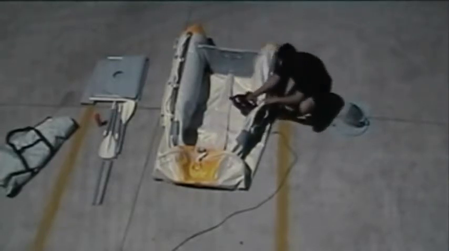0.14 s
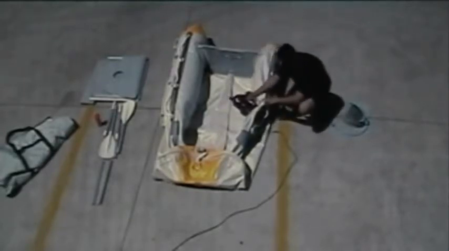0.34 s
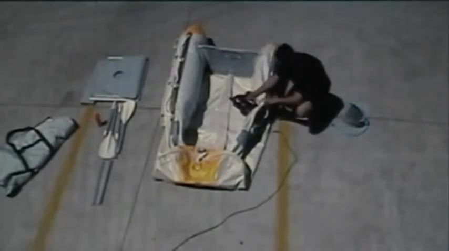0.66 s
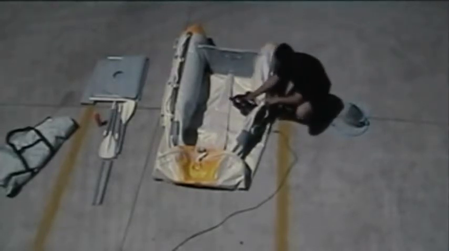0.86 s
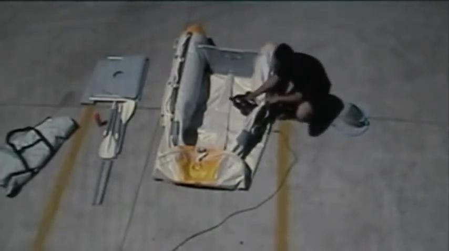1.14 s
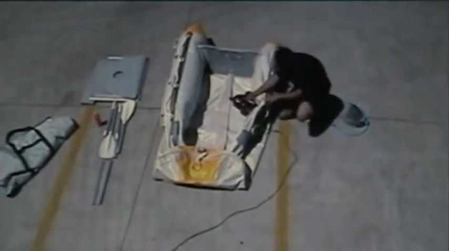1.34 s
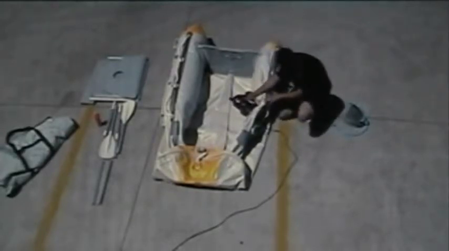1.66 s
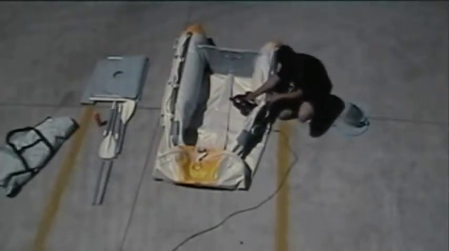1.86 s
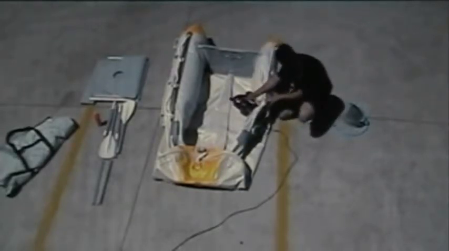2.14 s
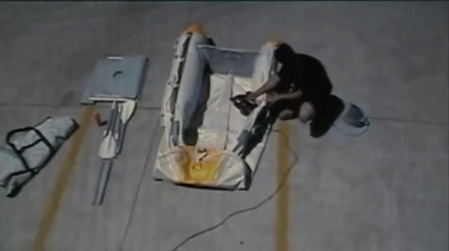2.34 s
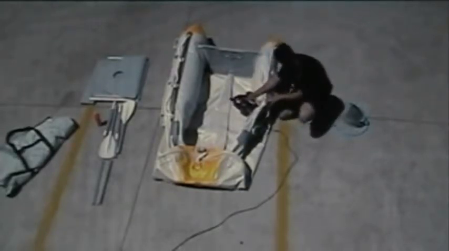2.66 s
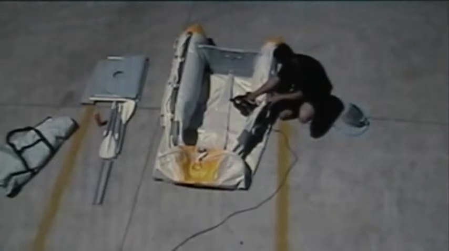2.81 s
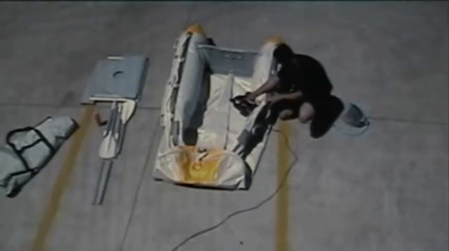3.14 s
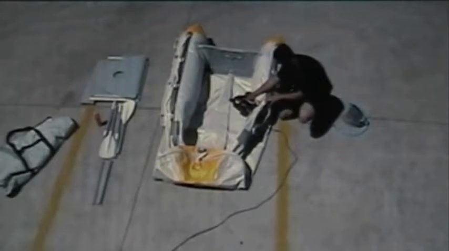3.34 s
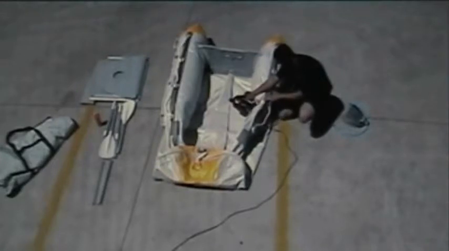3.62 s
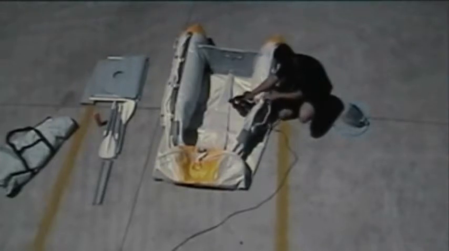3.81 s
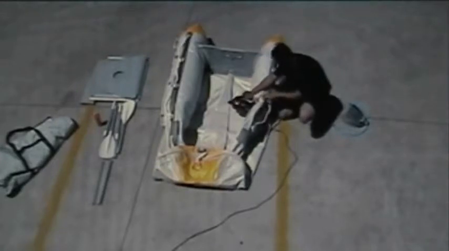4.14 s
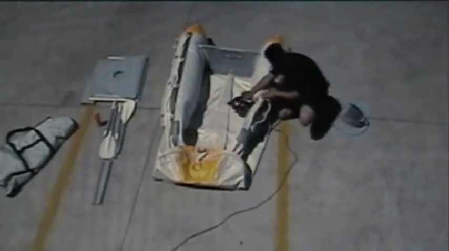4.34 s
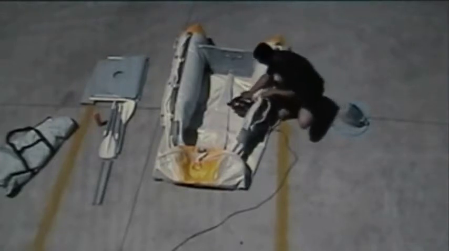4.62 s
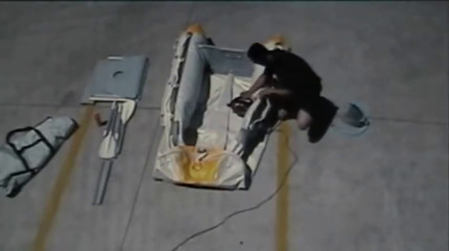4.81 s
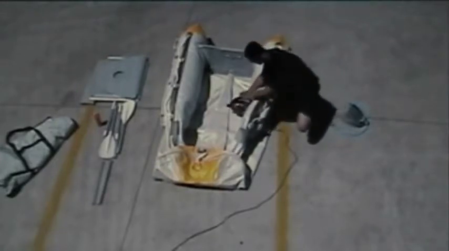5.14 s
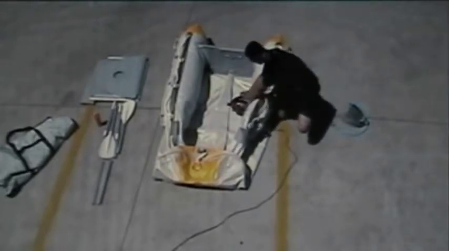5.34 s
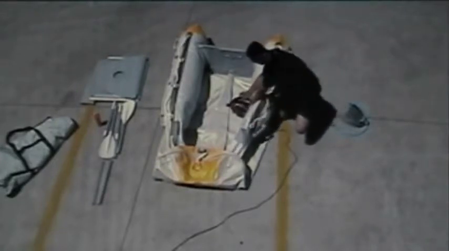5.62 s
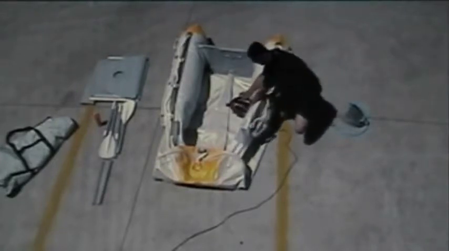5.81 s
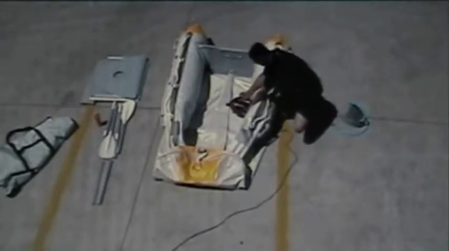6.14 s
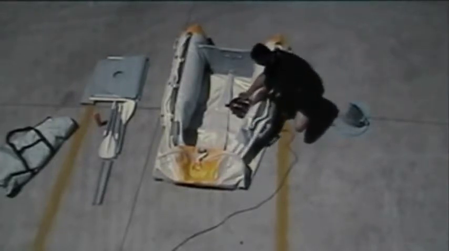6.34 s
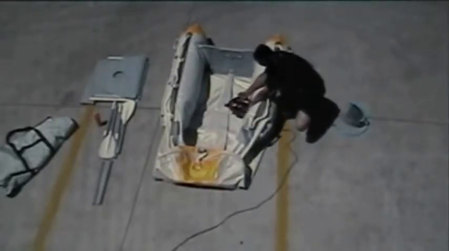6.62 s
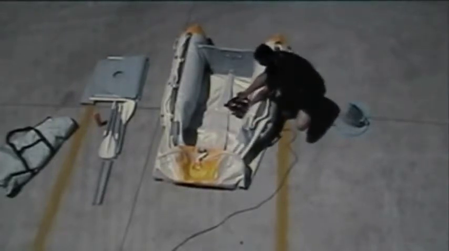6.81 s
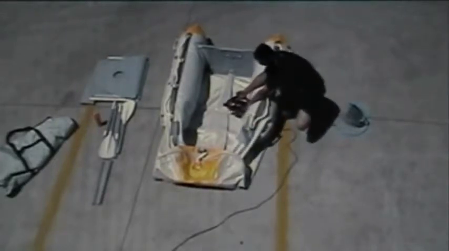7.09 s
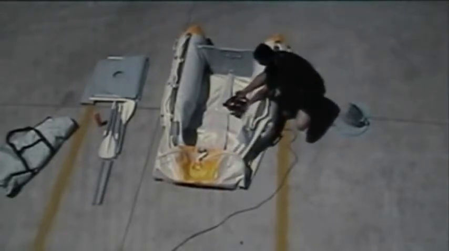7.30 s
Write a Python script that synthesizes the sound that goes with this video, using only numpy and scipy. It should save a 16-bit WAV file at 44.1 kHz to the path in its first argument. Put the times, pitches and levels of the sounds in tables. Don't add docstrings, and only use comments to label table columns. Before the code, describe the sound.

Steady loud rush of air from a handheld blower into a boat's valve, already running and never stopping. Small leaks briefly lift the hiss, soft whistles swell and fade, and a thin whine and low hum sit underneath. Midway the body leans over and the tone changes subtly. Concrete hall with close reflections and diffuse wash, microphones a few metres above, sound slightly to the right.

```python
import sys
import numpy as np
from scipy import signal
from scipy.fft import rfft, irfft, next_fast_len
from scipy.io import wavfile
from scipy.ndimage import uniform_filter1d

SR = 44100
rng = np.random.default_rng(int(sys.argv[2]) if len(sys.argv) > 2 else 0)


def undo_db(level):
    steps = np.asarray(level, float) / 20
    return 10 ** steps


def unload_audio(sound):
    columns = np.transpose(np.atleast_2d(sound))
    steps = np.round(np.clip(columns, -1, 1) * 32767)
    wavfile.write(sys.argv[1], SR, steps.astype(np.int16))


N = 328986
SIZE = next_fast_len(N + SR)
HZ = np.maximum(np.fft.rfftfreq(SIZE, 1 / SR), 1)


def rms_one(x):
    return x / np.sqrt(np.mean(x ** 2) + 1e-20)


def in_time(rows):
    s, *columns = np.transpose(rows)
    return [np.interp(np.arange(N) / SR, s, c) for c in columns]


def drift(rate_hz):
    every = 40
    r = np.exp(-2 * np.pi * every * rate_hz / SR)
    white = rng.standard_normal(N // every + 2002)
    slow = signal.lfilter([1], [1, -2 * r, r * r], white)[2000:]
    return np.interp(np.arange(N) / every, np.arange(len(slow)), rms_one(slow - slow.mean()))


def colour(points):
    hz, db = np.transpose(points)
    return undo_db(np.interp(np.log(HZ), np.log(hz), db))


def part(level_db, points, delays):
    inside = (HZ >= points[0][0]) & (HZ < points[-1][0])
    comb = np.zeros(len(HZ), complex)
    comb[inside] = 1 + sum(gain * np.exp(-2j * np.pi * HZ[inside] * ms / 1000) for ms, gain in delays)
    return undo_db(level_db) * colour(points) * comb


def gaussian(x, middle, width):
    return np.exp(-4 * np.log(2) * ((x - middle) / width) ** 2)


# pitch_hz, level_db (per Hz)
RUMBLE_COLOUR = [(20, -34), (54, -13), (119, -21), (152, -11), (266, -7.5), (380, -7)]


def rumble():
    return part(-74.5, RUMBLE_COLOUR, [])


# pitch_hz, level_db (per Hz)
CAVITY_COLOUR = [(380, -24), (460, -14), (550, -3.5), (660, -14.5), (800, -1.5), (960, -13), (1150, -27.5)]
# delay_ms, gain (signed ratio)
CAVITY_DELAYS = [(3.308, 0.24), (5.752, -0.19), (7.169, -0.16), (8.27, -0.13), (10.046, -0.18),
                 (15.768, 0.13)]


def cavity():
    return part(-56.5, CAVITY_COLOUR, CAVITY_DELAYS)


# pitch_hz, level_db (per Hz)
UPRIGHT_COLOUR = [(1130, -13), (1170, -20), (1220, -8), (1370, 1), (1660, -1.5), (2020, -6), (2450, -5.5),
                  (2970, -12), (3600, -20)]
# delay_ms, gain (signed ratio)
UPRIGHT_DELAYS = [(2.027, -0.1), (2.508, -0.07), (2.804, -0.12), (3.575, -0.12), (4.102, -0.17),
                  (4.496, 0.08), (5.719, 0.08), (6.12, -0.05), (6.672, 0.11), (7.098, -0.11), (7.755, 0.27),
                  (8.063, 0.1), (9.294, 0.14), (10.784, -0.09), (11.159, 0.06), (12.738, -0.05),
                  (15.313, -0.05), (16.043, -0.04), (18.52, 0.05), (27.212, 0.04)]


def outlet_upright():
    return part(-59.5, UPRIGHT_COLOUR, UPRIGHT_DELAYS)


# pitch_hz, level_db (per Hz)
HISS_COLOUR = [(3600, -5), (4150, -5), (4790, -7), (5530, -6.5), (6380, -5.5), (7370, -2), (8500, 0.0)]
# delay_ms, gain (signed ratio)
HISS_DELAYS = [(1.69, -0.13), (2.354, -0.08), (2.534, 0.07), (3.379, 0.1), (3.806, -0.03), (4.264, -0.11),
               (4.775, 0.1), (5.293, -0.04), (6.178, 0.05), (6.807, -0.05), (7.006, 0.06), (7.553, 0.08),
               (7.735, 0.11), (7.868, 0.26), (7.995, 0.1), (8.7, 0.03), (8.97, 0.07), (9.341, 0.06),
               (9.537, -0.13), (9.915, 0.05), (10.099, -0.1), (10.687, -0.05), (17.912, 0.04),
               (18.113, -0.05)]


def hiss():
    return part(-71.5, HISS_COLOUR, HISS_DELAYS)


# pitch_hz, level_db (per Hz)
FINE_COLOUR = [(8500, -5), (9230, 0.5), (10030, -5), (10890, -12), (11830, -8.5), (12840, -7.5),
               (13950, -13.5), (15150, -30)]
# delay_ms, gain (signed ratio)
FINE_DELAYS = [(1.397, -0.13), (1.662, -0.1), (1.922, -0.11), (2.141, 0.07), (2.29, 0.11), (2.9, 0.07),
               (3.169, 0.06), (4.282, -0.07), (4.458, -0.06), (6.559, -0.07), (6.793, 0.07), (7.334, 0.07),
               (7.528, 0.03), (7.637, -0.15), (7.74, 0.37), (7.906, -0.11), (8.05, -0.12), (8.938, -0.08),
               (9.096, 0.09), (9.673, -0.13), (10.838, 0.04), (11.566, 0.07), (12.356, 0.03),
               (17.965, -0.06)]


def fine_hiss():
    return part(-72.5, FINE_COLOUR, FINE_DELAYS)


def scattering():
    level_db, t60_s = -11, 0.25
    decay = rng.standard_normal(SR) * undo_db(-60 * np.arange(SR) / SR / t60_s)
    return 1 + undo_db(level_db) * rfft(decay / np.sqrt(np.sum(decay ** 2)), SIZE)


# pitch_hz, level_db (per Hz)
HALL_COLOUR = [(20, -30), (60, -26.5), (367, -16), (500, -10), (557, -5), (686, -12), (782, -5),
               (1040, -10), (1320, 1.5), (2280, -5), (4150, -18), (5250, -17.5), (7570, -10.5),
               (12100, -13.5), (15300, -17.5)]


def hall_wash():
    return undo_db(-66.5) * colour(HALL_COLOUR) * rfft(rng.standard_normal((2, SIZE)))


def ripple(modes):
    return undo_db(sum(db * gaussian(HZ, hz, width) for hz, width, db in modes))


# pitch_hz, width_hz, level_db
UPRIGHT_RIPPLE = [(678, 65, -3.1), (985, 16, -3.8), (1130, 16, -3.8), (1383, 16, -3.9), (1918, 30, -3.5),
                  (1582, 16, 3.1), (1679, 25, -3.5), (1717, 16, 3.7), (1889, 40, -3.5), (2320, 25, 2.8),
                  (2572, 40, -3.0), (3273, 65, -2.1), (3326, 16, -3.3), (3348, 16, 4.0), (3596, 100, -2.1),
                  (3905, 65, -2.5), (4473, 100, 2.4), (5049, 100, -2.1), (5205, 100, -2.0), (5932, 25, 4.3),
                  (6196, 40, 3.8), (6831, 25, -4.7), (6917, 100, -3.9), (7052, 100, -2.9), (7175, 65, -3.2),
                  (7337, 65, -2.7), (7725, 100, 3.2), (8446, 100, -4.9), (8801, 40, 3.9), (9727, 40, -4.0)]


def ripple_upright():
    return ripple(UPRIGHT_RIPPLE)


# time_s, turning_db (outlet to microphones), drive_db (into boat)
NOZZLE = [(0, 1.7, -4), (.6, 1.2, -1.5), (1.02, -2, -0.5), (1.35, -0.4, 1), (1.9, .1, 3.5), (2.6, 0.7, 2),
          (3.05, -0.2, 1.5), (3.4, -1.6, 3.5), (3.7, -0.9, 4), (4.0, 1, 7.5), (4.18, -3.5, -5),
          (5.2, -0.6, -4), (5.5, -1.5, -5.5), (5.72, 2.5, .1), (6.1, .1, -1.5), (6.6, 0.2, -1.5),
          (7.05, 0.5, -0.3), (7.46, 0.9, 2.5)]
# middle_s, length_s, level_db (extra hiss)
LEAKS = [
    (.3, 0.71, 3),
    (1.7, 0.49, 1.4),
    (2.5, 0.71, 1.4),
    (3.301, 0.57, 1.8),
    (3.8, 0.54, 1.8),
    (5.74, 0.2, 4),
    (6.4, 0.27, 0.7),
]
# level_db, turning_share, drive_share, leak_share, lean_db
REGISTERS = [
    (-58, -0.37, .2, 0.14, -1.3),
    (-38, -0.11, 1, -0.051, .01),
    (-39, 0.57, .4, 0.32, 1),
    (-34.5, 1, .01, -0.014, -0.6),
    (-36, 0.86, 0.12, 0.23, -1),
    (-36, .9, .1, -.1, 3.5),
    (-32, 0.77, .01, 0.087, 0.6),
    (-34.5, -0.025, .01, 0.78, 0.27),
    (-37.5, .2, .01, 0.99, -0.3),
]


def swells():
    turning_db, drive_db = in_time(NOZZLE)
    s = np.arange(N) / SR
    leak_db = sum(db * gaussian(s, middle, length) for middle, length, db in LEAKS)
    lean = lean_share(N)
    return [db + turn * turning_db + drive * drive_db + leak * leak_db + lean_db * lean
            for db, turn, drive, leak, lean_db in REGISTERS]


def between(low_hz, high_hz):
    def edge(hz):
        return np.clip(.5 + np.log2(HZ / hz) * 20, 0, 1) * np.pi / 2
    return np.sin(edge(low_hz)) * np.cos(edge(high_hz))


BAND_EDGES_HZ = [20, 385, 700, 1140, 1470, 1680, 1900, 3600, 8500, 15200]


def rush():
    near = rfft(rng.standard_normal(SIZE)) * scattering()
    wash = hall_wash()
    steady = rumble() + cavity() + hiss() + fine_hiss()
    upright = irfft((near * (steady + outlet_upright()) + wash) * ripple_upright(), SIZE)
    leaning = irfft((near * (steady + outlet_leaning()) + wash) * ripple_leaning(), SIZE)
    share = lean_share(SIZE)
    heard = rfft((1 - share) * upright + share * leaning)
    flutter = drift(7.6)
    out = 0
    for low_hz, high_hz, db in zip(BAND_EDGES_HZ, BAND_EDGES_HZ[1:], swells()):
        band = irfft(heard * between(low_hz, high_hz), SIZE)[:, :N]
        loudness = np.sqrt(uniform_filter1d(band.mean(axis=0) ** 2, size=SR))
        out = out + band / loudness * undo_db(db + 0.23 * flutter + 0.34 * drift(3.7))
    return out


# start_s, end_s, pitch_hz, width_hz, level_db
GAP_WHISTLES = [(.2, 1.0, 2260, 44, -40.5), (1.0, 2.9, 1540, 16, -39), (3.649, 4.15, 1580, 34, -35),
                (4.0, 5.7, 1812, 11, -39), (5.2, 6.099, 2059, 22.6, -42), (5.6, 7.46, 1708, 11, -39),
                (6.001, 7.46, 1774, 20, -43), (-.2, .6, 2300, 25, -42), (.25, 1.002, 1297, 31, -38),
                (4.75, 5.5, 1825, 16.4, -39), (5.6, 6.5, 1827, 20, -43), (6.098, 6.9, 1369, 23.3, -42),
                (1.7, 3.099, 1793, 25, -46)]


def gap_whistles():
    fade_s = 0.18
    out, s = np.zeros(N), np.arange(N) / SR
    white = rng.standard_normal(N)
    for start, end, hz, width, db in GAP_WHISTLES:
        r = np.exp(-np.pi * width / SR)
        poles = [1, -2 * r * np.cos(2 * np.pi * hz / SR), r * r]
        once = signal.lfilter([1, 0, -1], poles, white)
        breath = signal.lfilter([1], poles, once)
        swell = np.clip(np.minimum(s - start, end - s) / fade_s, 0, 1)
        out += undo_db(db) * swell * rms_one(breath)
    return out


def sine(hz, wobble_hz, wobble_db):
    phase = 2 * np.pi * (np.cumsum(hz + wobble_hz * drift(2.9)) / SR + rng.random())
    return np.sqrt(2) * undo_db(wobble_db * drift(5.7)) * np.sin(phase)


# time_s, pitch_hz, level_db
WHISTLE = [(0, 556.4, -40), (1, 553.8, -42.5), (1.6, 557.6, -38), (2.5, 557.5, -41), (3, 556, -44),
           (3.6, 557.7, -35.5), (4.2, 559, -39.5), (5, 557.6, -41), (5.5, 558.5, -45), (6, 556, -39),
           (6.6, 555.5, -34.5), (7, 556.4, -40), (7.46, 558, -46)]


def cavity_whistle():
    hz, db = in_time(WHISTLE)
    return undo_db(db) * sine(hz, wobble_hz=.4, wobble_db=.8)


# time_s, pitch_hz, level_db
WHINE = [
    (0, 3300, -62),
    (1.5, 3320, -50),
    (3.8, 3326, -51),
    (4.3, 3390, -49),
    (7.46, 3260, -66),
]


def whine():
    hz, db = in_time(WHINE)
    return undo_db(db) * sine(hz, wobble_hz=2.64, wobble_db=2.5)


# multiple (ratio), level_db, left_lead (cycles)
SHAFT_ORDERS = [
    (1, -68, .1),
    (2, -50, .04),
    (3, -50.5, .2),
]


def motor_shaft():
    shaft_hz = 382.9
    turns = np.cumsum(shaft_hz + .1 * drift(1.5)) / SR
    out = 0
    for multiple, db, lead in SHAFT_ORDERS:
        cycles = multiple * turns + rng.random() + [[lead], [0]]
        out = out + undo_db(db + 0.38 * drift(2.9)) * np.sqrt(2) * np.sin(2 * np.pi * cycles)
    return out


# pitch_hz, level_db
HUM = [
    (49.9, -75),
    (78.7, -81),
    (100.2, -77),
    (150.1, -72),
    (234.2, -75),
    (296.7, -64.5),
    (300.1, -71),
    (339.2, -66.5),
    (1287.3, -54),
]


def hum():
    return sum(undo_db(db) * sine(hz + np.zeros(N), wobble_hz=.1, wobble_db=.8) for hz, db in HUM)


def tones():
    steady = cavity_whistle() + whine() + hum()
    return motor_shaft() + [steady, np.roll(steady, shift=2)]


# time_s, share (0-1)
LEAN = [
    (0, 0),
    (4.0, 0),
    (4.3, 0.4),
    (7.46, 0.99),
]


def lean_share(samples):
    return np.interp(np.arange(samples) / SR, *np.transpose(LEAN))


# pitch_hz, level_db (per Hz)
LEANING_COLOUR = [(1130, -17), (1170, -14), (1220, -6), (1370, -1.5), (1660, -3), (2020, -3.5),
                  (2450, -7.5), (2970, -12), (3600, -19)]
# delay_ms, gain (signed ratio)
LEANING_DELAYS = [(1.552, 0.12), (1.951, -0.19), (2.298, 0.18), (3.036, 0.1), (3.617, -0.15),
                  (4.116, -0.19), (4.496, 0.14), (5.038, 0.06), (5.866, 0.09), (6.653, 0.13),
                  (7.096, -0.09), (7.751, 0.24), (8.069, 0.15), (9.302, 0.17), (10.771, -0.06),
                  (11.356, -0.05), (12.726, -0.04), (13.453, -0.06), (16.095, -0.03), (23.487, 0.03)]


def outlet_leaning():
    return part(-59.5, LEANING_COLOUR, LEANING_DELAYS)


# pitch_hz, width_hz, level_db
LEANING_RIPPLE = [(592, 25, -2.5), (640, 40, 3.1), (1060, 40, 3.2), (1125, 16, -4.4), (1189, 25, 2.3),
                  (1248, 25, -2.3), (1383, 16, -3.0), (1480, 25, -2.5), (1679, 25, -2.8), (1894, 65, -2.1),
                  (1918, 25, -3.0), (2094, 16, -4.0), (2712, 40, 2.0), (2320, 25, 2.9), (2352, 16, -3.1),
                  (2896, 40, -2.1), (3057, 40, -2.3), (3170, 40, -1.8), (3905, 65, -2.0), (4489, 100, 1.9),
                  (5092, 40, 2.6), (6196, 25, 3.6), (6917, 100, -2.8), (7035, 100, -4.3), (7165, 65, -2.5),
                  (7622, 100, 4.0), (8322, 40, -3.7), (8446, 100, -4.8), (9183, 25, -4.5), (9625, 40, -4.1)]


def ripple_leaning():
    return ripple(LEANING_RIPPLE)


def scene():
    left_db = -1.3
    return (rush() + gap_whistles() + tones()) * undo_db([[left_db / 2], [-left_db / 2]])


def top_cut(x):
    return signal.sosfilt(signal.butter(12, 15180, fs=SR, output="sos"), x)


def record(dry):
    return top_cut(dry)


dry = scene()
out = record(dry)
unload_audio(out)
```